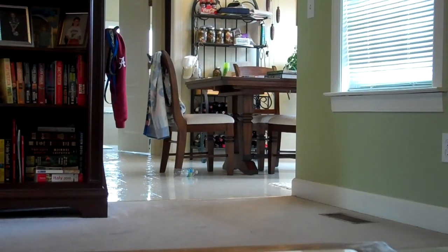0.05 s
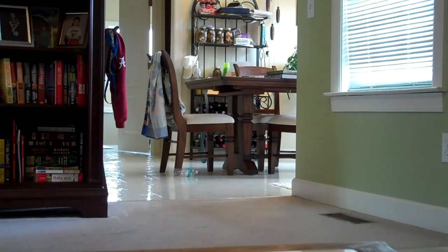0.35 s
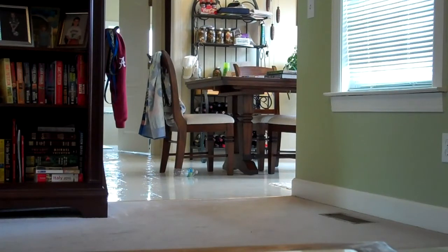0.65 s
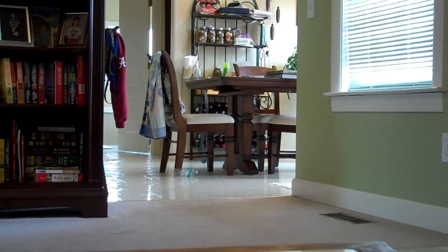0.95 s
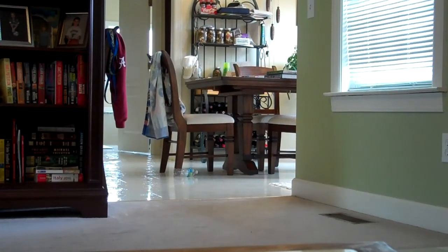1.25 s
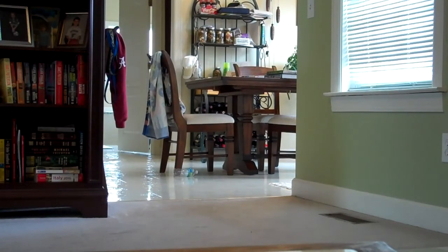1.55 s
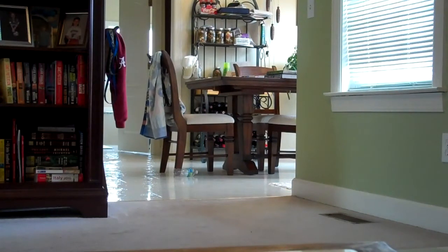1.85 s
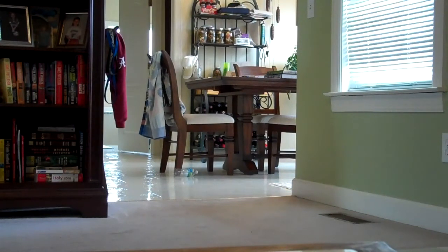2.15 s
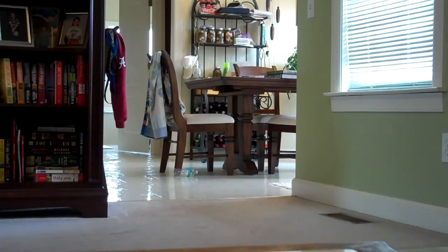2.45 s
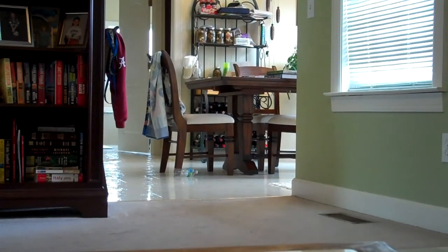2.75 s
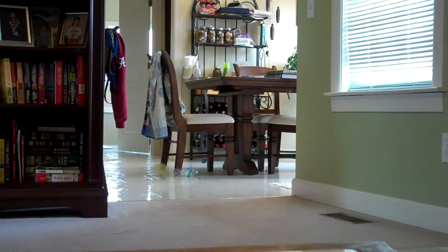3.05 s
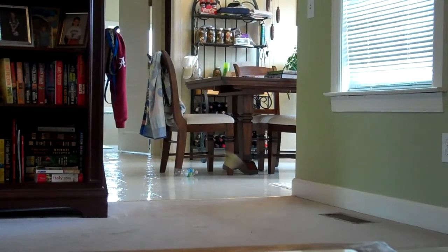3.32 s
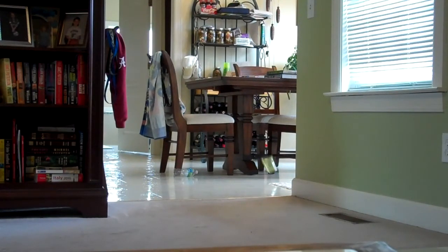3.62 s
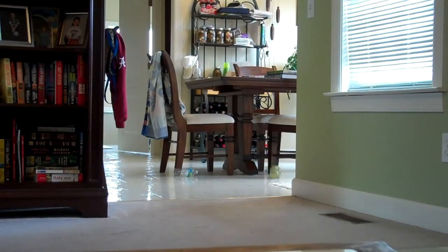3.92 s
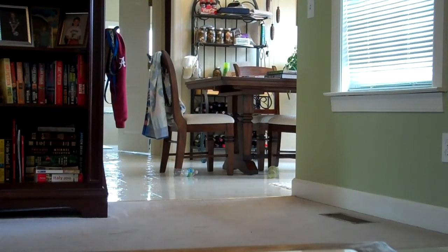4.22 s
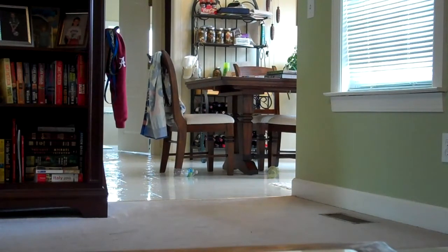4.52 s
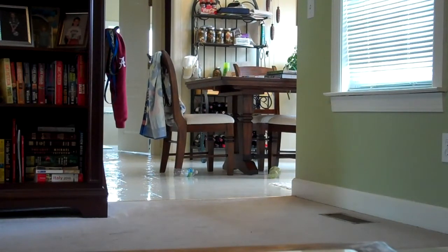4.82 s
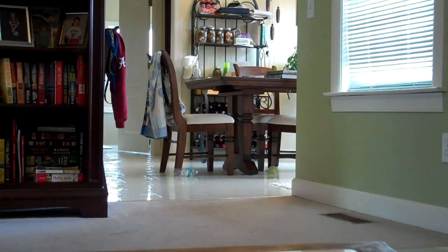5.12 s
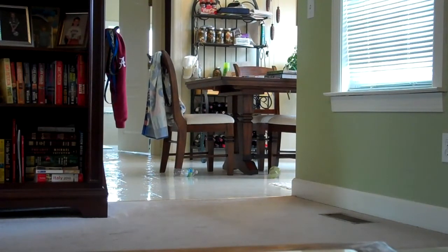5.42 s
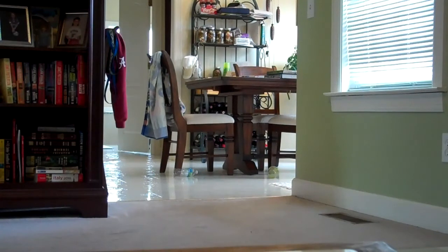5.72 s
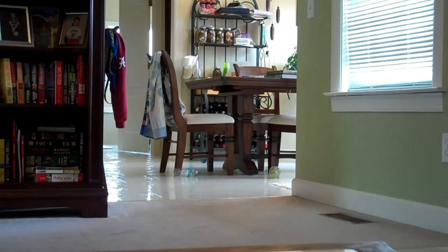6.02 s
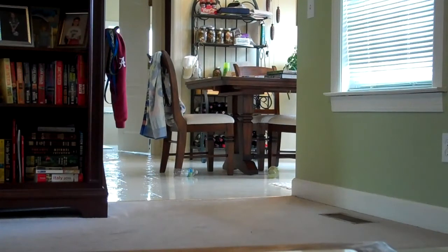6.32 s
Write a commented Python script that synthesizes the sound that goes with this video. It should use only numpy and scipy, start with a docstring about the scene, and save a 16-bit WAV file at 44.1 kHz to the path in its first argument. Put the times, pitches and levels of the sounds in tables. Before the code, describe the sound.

A fan hisses faintly and steadily throughout, heard from the room next to a kitchen. After a barely audible tap at about 0.4 seconds, three soft, dull knocks with light clinks come between 1.3 and 1.7 seconds, as of something handled on a counter. Two very faint ticks follow near 2 and 2.7 seconds. At about 3 seconds a small hollow plastic object hits the tiled floor with a sharp crack, the loudest moment, stronger on the left. It bounces at roughly 3.2, 3.5, 3.8 and 4 seconds, each landing a bright clack with a hollow note and a light thud. The bounces then quicken and weaken, chattering to rest by about 4.4 seconds. The hard room gives every hit a short echo. After that, only the fan remains until the end, near 6.6 seconds.

```python
"""A fan hisses faintly all along, and we listen from the room next to a kitchen.
First come a few soft knocks, as of something handled on a counter.
Then a small hollow plastic object hits the tiles with a crack, bounces and chatters to rest.
Each landing gives a floor thud, a hollow note, a clack of the stiff walls and a tick of the edge.
After each hit, the hard room answers with early echoes and a short tail."""
import sys
import numpy as np
from scipy import signal
from scipy.fft import rfft, irfft
from scipy.io import wavfile
from scipy.ndimage import uniform_filter1d, minimum_filter1d

SR = 44100
rng = np.random.default_rng(int(sys.argv[2]) if len(sys.argv) > 2 else 0)


def bounce(signal):
    """Save signal as a 16-bit WAV file at the path given by the first command-line argument."""
    frames = np.transpose(np.atleast_2d(signal))
    limited = np.clip(frames, -1, 1)
    pcm = np.round(limited * 32767).astype(np.int16)
    wavfile.write(sys.argv[1], SR, pcm)


N = 289692

# Levels in the tables are relative. A mode is a pitch at which something likes to ring.
# broad rush of the fan: f/Hz, level/dB
FAN_RUSH = [(30, -17), (80, -21), (115, -8), (180, -11), (330, -0.5), (680, -0.5), (880, -7.5),
            (1200, -0.5), (3100, 1.5), (3800, -5), (4500, -1.5), (7600, -5.5), (8700, -15.5), (12000, -27)]
# room modes that the fan feeds: f/Hz, width/Hz, level/dB
FAN_ROOM_MODES = [(316.7, 8.9, -1.5), (349, 8.5, -3), (412.6, 13, -0.5), (477, 5.9, -4),
                  (542.6, 11.3, -0.5), (746, 13.3, -2), (1106, 61, -4.5), (1182.6, 11.8, 0),
                  (1364, 6.4, -0.5), (1473, 25, 2.5), (1616, 33, 0), (1715.5, 17, -1), (1928, 4.6, -2),
                  (2977, 11, 1.5)]
# how alike left and right are, for the fan and for the room: f/Hz, likeness (1 = the same)
FAN_LIKENESS = [(30, 0.0072), (120, 0.66), (380, 1), (700, 0.97), (1300, 0.84), (2400, 0.64), (4400, 0.4),
                (8000, 0.61), (14000, 0.24)]
ROOM_LIKENESS = [(60, 0.86), (290, 1), (640, 0.97), (1400, 0.82), (3080, 0.47), (6770, 0.15), (14000, 0.14)]
# direct sound and its rebound from the furniture: delay/ms, level/dB
DIRECT_PATHS = [(0.1, -10), (2.1, -4.5)]
# cluster of echoes through the doorway: extra delay/ms, level/dB
DOOR_ECHOES = [(0.102, -1.5), (0.698, -21), (2.502, -2), (3.1, -10), (6.5, -12)]
# time the room takes to fade by 60 dB: f/Hz, t/s
ROOM_FADE = [(150, 0.32), (400, 0.6), (800, 0.57), (2000, 0.53), (5000, 0.5), (8000, 0.5), (14000, 0.36)]
# soft knocks before the drop: t/s, body level/dB, tick level/dB, clink level/dB
SOFT_KNOCKS = [(0.368, -54, -49.5, -65), (1.311, -33.5, -52, -53), (1.523, -29.5, -46, -46.5),
               (1.646, -29.5, -43.5, -40.5), (2.02, -63, -53.5, -70), (2.69, -60, -53, -73)]
# body of the knocked thing: multiple of KNOCK_HZ, width/Hz, level/dB
KNOCK_BODY_MODES = [(.64, 151, -7), (1, 59.6, 1), (1.18, 100, -10), (1.58, 100, -9), (2.05, 200, -15.5),
                    (2.4, 300, -32), (3.65, 500, -22)]
# its dry tick and its thin clink: f/Hz, width/Hz, level/dB
KNOCK_TICK_MODES = [(5000, 830, -6), (6200, 820, -4.5), (7300, 430, -0.5), (8260, 270, -6)]
KNOCK_CLINK_MODES = [(4473, 50, 0), (4680, 150, -13)]
# low ringing of the floor under a blow: f/Hz, width/Hz, level/dB
FLOOR_MODES = [(213, 53, -0.5), (233, 25, -1.5), (299.6, 21, 3), (379, 12, 4), (470, 240, -7.5),
               (570, 50, -13)]
# the plastic object bending, and its stiff walls clacking: f/Hz, width/Hz, level/dB
BEND_MODES = [(1402, 30, -3), (1710, 150, -3), (1850, 170, -7), (2417, 26, 2), (2587, 60, -4),
              (3090, 170, -2)]
CLACK_MODES = [(3070, 220, -5.5), (3554, 92, -6), (4135, 66, -2.5), (4416, 60, 0.5), (4520, 26, -5),
               (4840, 125, -1), (5300, 120, -3), (5935, 110, 1), (6290, 156, 1.5), (6910, 210, -2),
               (7280, 61, -0.5), (7480, 185, -0.5), (8200, 240, -9), (9000, 500, -15.5)]
# tick of its edge on the tile: f/Hz, level/dB
EDGE_TICK = [(3000, 5), (6000, -15), (9000, 5), (10500, -3), (12500, -4), (14000, -6), (16000, 2.5)]
# landings: t/s, level/dB, clack boost/dB, hollow note boost/dB, hollow f/Hz, favoured wall f/Hz
LANDINGS = [ (2.9776, -19, 8, -1.5, 905, 7400), (3.110, -32, 1.5, 11, 680, 4900),
            (3.1716, -23.5, 3.5, -2.5, 845, 6600), (3.495, -24, 8.5, 4.5, 778, 7300),
            (3.777, -29, 2, 12, 812, 7100), (3.812, -45, -5, 23, 827, 7000),
            (3.878, -38.5, 1.5, 5, 800, 6200), (4.0402, -29.5, 9, 0.5, 828, 3150),
            (4.1757, -34, 4.5, 1.5, 843, 3150), (4.258, -46, 16.5, 4.5, 797, 6100),
            (4.3157, -51.5, 13.5, 3.5, 794, 6100), (4.352, -55, 13, -2, 790, 6100)]
# how much louder the left microphone is than the right: f/Hz, level/dB
MIC_MISMATCH = [(200, -0.5), (2000, 0.5), (5900, 0.5), (6600, 3.5), (7600, 9.5), (9000, 11), (11000, 13),
                (14000, 7)]

SIZE = 32768  # samples in one hit with its echoes
HIT_FREQS, SCENE_FREQS = np.fft.rfftfreq(SIZE, 1 / SR), np.fft.rfftfreq(N, 1 / SR)
KNOCK_HZ = 752
DROP_S, TRAVEL_S = LANDINGS[0][0], 0.748  # first landing; time to skip from doorway to wall


def undb(db):
    """Turn decibels into a gain."""
    return 10 ** (np.asarray(db) / 20)


def curve(points, hz):
    """Read between (f/Hz, value) points, with all octaves equally wide."""
    f, value = np.transpose(points)
    return np.interp(np.log(hz + 1), np.log(f), value)


def resonances(modes, hz):
    """Power at each frequency of something that rings: one peak for each mode."""
    return sum(undb(2 * db) / (1 + ((hz ** 2 - f ** 2) / (width * (hz + 1))) ** 2)
               for f, width, db in modes)


def band(hz, low_hz, high_hz, order=6):
    """Share of the power let through; it falls steeply outside the two limits."""
    return 1 / (1 + (low_hz / (hz + 1)) ** order) / (1 + (hz / high_hz) ** order)


def noise_pair(likeness, size):
    """Spectra of a left and a right noise, as alike as the table says."""
    alike = np.clip(curve(likeness, np.fft.rfftfreq(size, 1 / SR)), -.99, .99)
    mid, side = rfft(rng.standard_normal((2, size)))
    return np.sqrt((1 + alike) / 2) * mid + np.sqrt((1 - alike) / 2) * side * np.array([[1], [-1]])


def wobble(position, count):
    """A wandering line with a new random value at each whole position."""
    return np.interp(position, np.arange(count), rng.standard_normal(count))


def blow(parts):
    """Spectrum of one hit that sets several (level/dB, power curve) parts ringing together."""
    power = sum(undb(2 * db) * shape / shape.mean() for db, shape in parts)
    # minimum phase: the sound starts suddenly, then rings away
    cepstrum = irfft(.5 * np.log(power + power.max() * 1e-10))
    cepstrum[1:SIZE // 2] *= 2
    cepstrum[SIZE // 2 + 1:] = 0
    return np.exp(rfft(cepstrum))


def place(events):
    """Lay (t/s, stereo spectrum) hits on the time line; each fades to silence."""
    out = np.zeros((2, N + SIZE))
    fade = np.clip(np.linspace(4, -.1, SIZE), 0, 1)
    for time_s, spectrum in events:
        start = int(time_s * SR)
        out[:, start:start + SIZE] += irfft(spectrum) * fade
    return out[:, :N]


def fan(level_db=-44.5, modes_db=10, right_delay_s=.00009, split_hz=600, ripple_db=2.5):
    """A fan off to the left rushes steadily, coloured by the room; its low part wavers."""
    hz = SCENE_FREQS
    room_ring = undb(2 * modes_db) * resonances(FAN_ROOM_MODES, hz) * band(hz, 260, 4750)
    power = undb(2 * curve(FAN_RUSH, hz)) + room_ring
    # countless weak room modes add a random peak or dip every 14 Hz
    ripple = undb(ripple_db * wobble(hz / 14, count=2000) * band(hz, 190, 5200))
    from_left = np.exp(-2j * np.pi * hz * np.array([[0], [right_delay_s]]))
    spectrum = noise_pair(FAN_LIKENESS, N) * np.sqrt(power) * ripple * from_left
    low = 1 / (1 + (hz / split_hz) ** 4)
    waver = undb(1.5 * wobble(np.arange(N) / SR * 7, count=400))  # 7 new values a second
    rush = irfft(spectrum * low, N) * waver + irfft(spectrum * (1 - low), N)
    return undb(level_db) * rush / rush.std()


def room_tail(build_s=0.0022):
    """Countless echoes blur into a noise that swells quickly and dies away."""
    t = np.arange(SIZE) / SR
    noise = noise_pair(ROOM_LIKENESS, SIZE)
    tail = 0
    for band_hz, fade_s in ROOM_FADE:
        share = curve([(f, f == band_hz) for f, _ in ROOM_FADE], HIT_FREQS)
        tail = tail + irfft(noise * share) * np.exp(-np.log(1000) * t / fade_s)
    tail = tail * (1 - np.exp(-t / build_s))
    return tail / np.sqrt(np.sum(tail ** 2) / 2)


def smear(spread_s=0.000458, count=24):
    """Edges and chair legs delay each frequency differently, which blunts a click."""
    delays = spread_s * np.abs(rng.standard_normal(count))
    delay = np.interp(HIT_FREQS, np.linspace(0, SR / 2, count), delays)
    return np.exp(-2j * np.pi * np.cumsum(delay) * HIT_FREQS[1])


def kitchen(echo_db, echo_ms, tail_db=2.5, scatter_db=-10, scatter_s=0.0024):
    """The room's answer from one spot: direct sound, doorway echoes, furniture scatter and tail."""
    tail = room_tail()
    early = 0
    for path_ms, path_db in DIRECT_PATHS + [(echo_ms + ms, echo_db + db) for ms, db in DOOR_ECHOES]:
        # each path shifts from spot to spot and meets the two microphones at its own angle
        shift_s = .0001 * rng.standard_normal()
        side_s = .00005 * rng.standard_normal() * np.array([[.5], [-.5]])
        delay = abs(path_ms / 1000 + shift_s + side_s)
        early = early + undb(path_db) * np.exp(-2j * np.pi * HIT_FREQS * delay) * smear()
    since_echo = np.arange(SIZE) / SR - echo_ms / 1000
    scatter = irfft(noise_pair(ROOM_LIKENESS, SIZE))
    scatter *= (since_echo > 0) * np.exp(-abs(since_echo) / scatter_s)
    scatter /= np.sqrt(np.sum(scatter ** 2) / 2)
    # small surfaces mirror the treble best
    mirror = undb(curve([(300, -12), (800, -10.5), (3000, -0.5), (7000, 3.0)], HIT_FREQS))
    return mirror * (early + undb(scatter_db) * rfft(scatter)) + undb(tail_db) * rfft(tail)


def knocks(gain_db=27, thump_db=-26.5):
    """Dull knocks with a tick or a clink on top and a low thump of the counter below."""
    hz = HIT_FREQS
    body_modes = [(multiple * KNOCK_HZ, width, db) for multiple, width, db in KNOCK_BODY_MODES]
    body = resonances(body_modes, hz) * band(hz, 246, 3000)
    tick = resonances(KNOCK_TICK_MODES, hz) * band(hz, 3200, 8300)
    clink = resonances(KNOCK_CLINK_MODES, hz) * band(hz, 3200, 6500)
    thump = band(hz, 85, 190)
    events = []
    for time_s, body_db, tick_db, clink_db in SOFT_KNOCKS:
        hit = blow([(body_db, body), (body_db + thump_db, thump), (tick_db, tick), (clink_db, clink)])
        events.append((time_s, hit * kitchen(echo_db=-6, echo_ms=4.5)))
    return undb(gain_db) * place(events)


def first_crack(length_s=0.00386, crack_db=-4, overload_db=-10, right_db=-7):
    """The first, hardest landing cracks and overloads the left microphone, which gives a low pop."""
    progress = np.clip((np.arange(N) / SR - DROP_S) / length_s, 0, 1)
    burst = np.sqrt(np.maximum(np.sin(np.pi * progress), 0))
    noise = irfft(noise_pair(ROOM_LIKENESS, N) * np.sqrt(band(SCENE_FREQS, 460, 9500)), N)
    crack = undb(crack_db) * noise / noise.std() * undb([[0], [right_db]])
    overload_pop = undb(overload_db) * np.array([[1], [0]])
    return burst * (crack - overload_pop)


def plastic_hit(clack_db, bend_db, hollow_db, thud_db, tick_db, hollow_hz, wall_hz):
    """The object and the floor ring; the spot that meets the tile decides which modes are loudest."""
    hz = HIT_FREQS
    favour_db, spread_db = 4, 3.0  # boost near wall_hz; random change from hit to hit
    walls = []
    for f, width, db in CLACK_MODES:
        boost_db = favour_db * np.exp(-((f - wall_hz) / 450) ** 2)
        walls.append((f, width, db + boost_db + spread_db * rng.standard_normal()))
    bends = [(f, width, db + spread_db * rng.standard_normal()) for f, width, db in BEND_MODES]
    # the hollow note is a cluster of close modes that die quickly
    hollow = [(1.024 * hollow_hz, 70, 0), (0.89 * hollow_hz, 70, -1),
              (1.23 * hollow_hz, 150, -12), (0.585 * hollow_hz, 150, -13)]
    return blow([(clack_db, resonances(walls, hz) * band(hz, 3120, 9200)),
                 (bend_db, resonances(bends, hz) * band(hz, 800, 3550)),
                 (hollow_db, resonances(hollow, hz) * band(hz, 290, 1.23 * hollow_hz, order=12)),
                 (thud_db, resonances(FLOOR_MODES, hz) * band(hz, 62, 660)),
                 (tick_db, undb(2 * curve(EDGE_TICK, hz)) * band(hz, 1500, 15600))])


def bounces(gain_db=27):
    """The object skips from the open doorway to the wall; each landing sounds from a new spot."""
    events = []
    for time_s, strength_db, clack_boost_db, hollow_boost_db, hollow_hz, wall_hz in LANDINGS:
        way = np.clip((time_s - DROP_S) / TRAVEL_S, 0, 1)  # 0 at the doorway, 1 at the wall
        shade = way ** 6  # the wall weakens tick and thud only near the end of the way
        clack_db, hollow_db = strength_db + clack_boost_db, strength_db + hollow_boost_db
        tick_db = -9.5 + 1.33 * clack_db - shade  # grows faster than the clack with a harder blow
        thud_db = -11 + 0.76 * (clack_db + hollow_db) / 2 - 7 * shade
        # on the way, the doorway echo gets louder and comes sooner
        room = kitchen(echo_db=-10 + 9 * way, echo_ms=7.5 - 1.4 * way)
        hit = plastic_hit(clack_db, strength_db, hollow_db, thud_db, tick_db, hollow_hz, wall_hz)
        events.append((time_s, hit * room))
    return undb(gain_db) * place(events)


def scene():
    """Knocks, then the falling object, over the fan."""
    return knocks() + first_crack() + bounces() + fan()


def limit(sound, window=25):
    """Turn each channel down just ahead of a peak, so it stays under full scale."""
    gain = np.minimum(1, .98 / (np.abs(sound) + 1e-9))
    held = minimum_filter1d(gain, window, axis=1)
    return sound * uniform_filter1d(held, window, axis=1)


def record(dry, hiss_db=-66, whine_db=-75, whine_hz=10000, top_hz=14200):
    """The left microphone is brighter; the electronics hiss, whine, limit peaks and cut the top."""
    mismatch = undb(curve(MIC_MISMATCH, SCENE_FREQS) * np.array([[.5], [-.5]]))
    heard = irfft(rfft(dry) * mismatch, N)
    hiss = undb(hiss_db) * rng.standard_normal((2, N))
    whine = undb(whine_db) * np.sin(2 * np.pi * whine_hz * np.arange(N) / SR)
    treble_cut = signal.ellip(10, .05, 50, top_hz, fs=SR, output="sos")
    return signal.sosfiltfilt(treble_cut, limit(heard + hiss + whine))


dry = scene()
out = record(dry)
bounce(out)
```